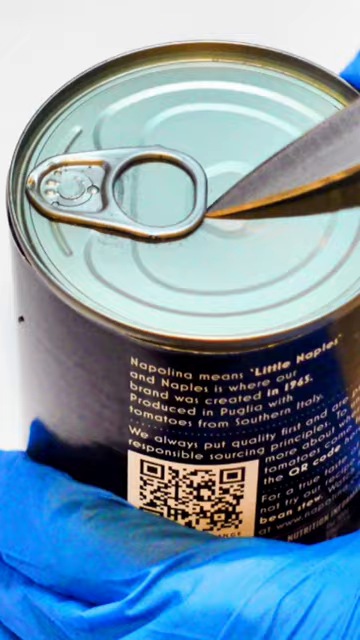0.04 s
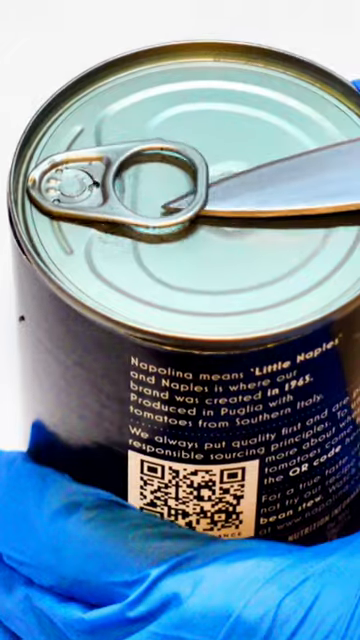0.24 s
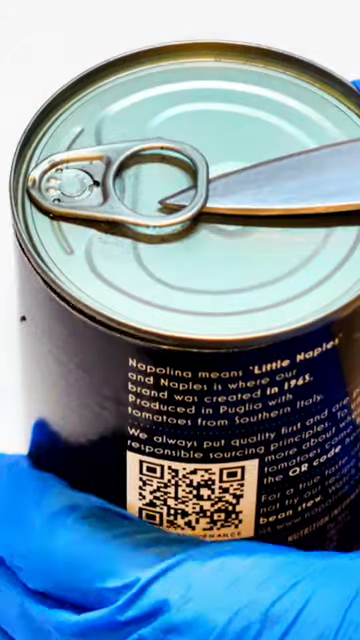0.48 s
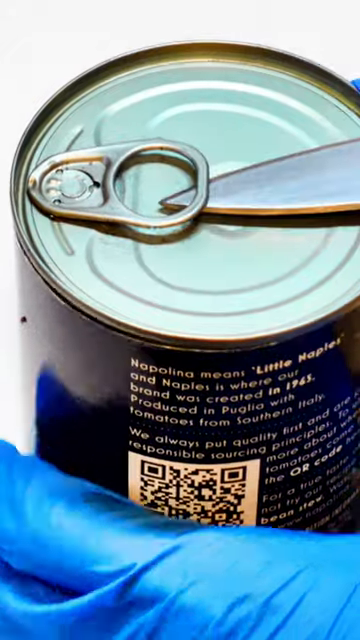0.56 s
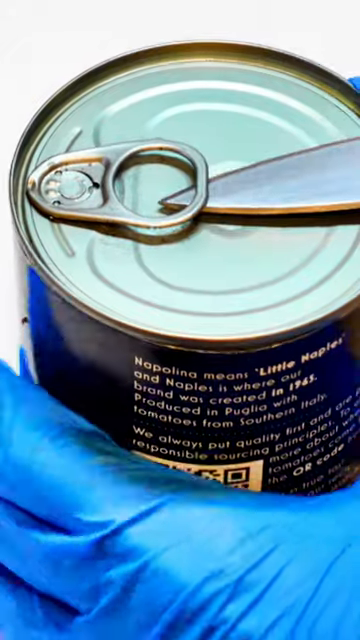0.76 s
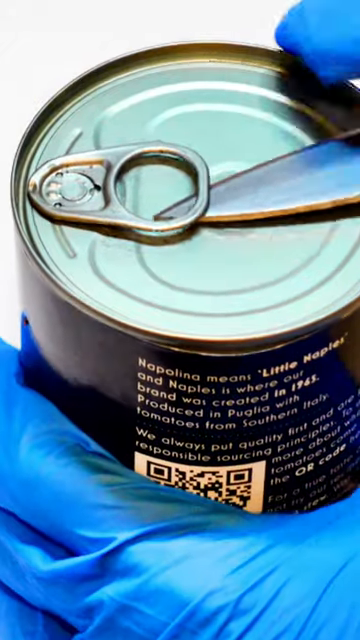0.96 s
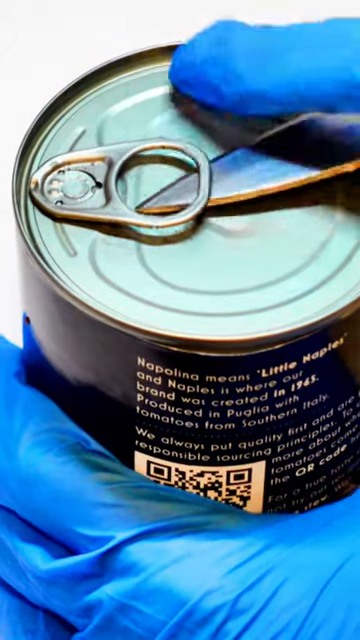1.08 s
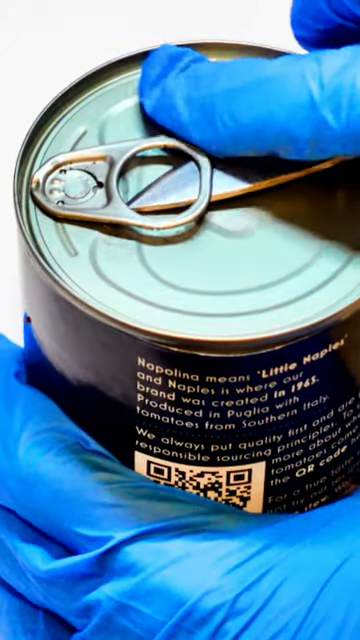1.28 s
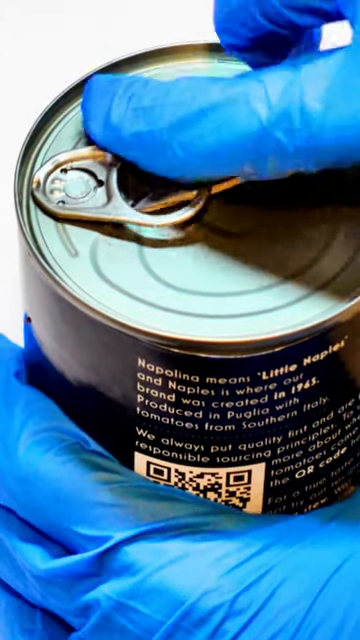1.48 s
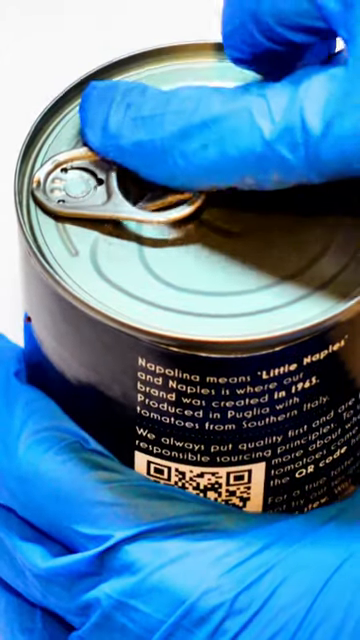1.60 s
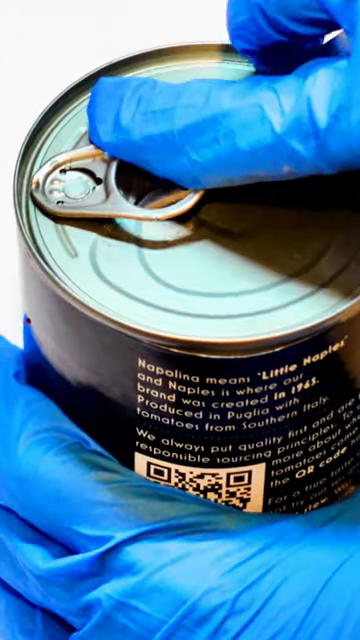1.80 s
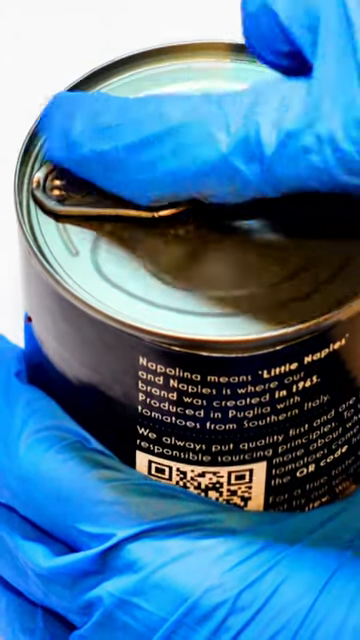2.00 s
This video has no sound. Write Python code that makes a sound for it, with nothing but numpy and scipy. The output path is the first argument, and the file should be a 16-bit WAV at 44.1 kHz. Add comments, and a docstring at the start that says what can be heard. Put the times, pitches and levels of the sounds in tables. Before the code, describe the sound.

A knife tip skids and taps on a tin can lid from about 0.1 seconds, clacking under the ring pull near 0.3 with a soft handling rumble. At 1 second the blade pries with a short metallic scrape and click. A rubber glove rustles faintly until the end, and the ring ticks sharply at 1.8 seconds. Steady hiss and a low hum fill the small room.

```python
"""A knife tip skids and taps on the lid of a full tin can, knocks under the ring pull and pries it up.
Lid and ring sound as damped modes plus a noisy crack; sliding is a stream of tiny slips.
The holding hand settles with a soft rumble; a gloved finger rustles in and lifts the ring, which ticks.
A hard surface close by echoes everything, in a small room with steady hiss and a low hum."""
import sys
import numpy as np
from scipy import signal
from scipy.fft import rfft, irfft
from scipy.io import wavfile

SR = 44100
rng = np.random.default_rng(int(sys.argv[2]) if len(sys.argv) > 2 else 0)


def generate_wav(signal):
    """Clip the signal to [-1, 1] and save it as 16-bit WAV at the path in sys.argv[1]."""
    frames = np.transpose(np.atleast_2d(signal))
    scaled = np.clip(frames, -1, 1) * 32767
    pcm = np.round(scaled).astype(np.int16)
    wavfile.write(sys.argv[1], SR, pcm)


N = 90404
TIME_S, DECAY_TIME_S = np.arange(N) / SR, np.arange(SR // 2) / SR

# Each row: frequency in Hz, t60 in seconds before blade damping, tapped level in dB, pried level in dB.
LID_MODES = [(588.7, 0.21, -13, -25.5), (828, 0.11, -50, -50), (1021, .09, -29, -48),
             (1144, 0.2, -5.5, -15), (1238, .12, -8.5, -28), (1322, 0.044, 0, -27),
             (1380, 0.15, -2.5, -1.5), (1425, 0.04, -3, -30), (1504, 0.42, -11.5, -15),
             (1592, 0.51, -18, -14), (1685, .12, -39, -24), (2625, 0.13, -29, -20.5),
             (3095, 0.24, -21, -43), (3120, 0.043, -31, -31)]
# Each row: frequency in Hz, t60 in seconds, level in dB.
RING_PULL_MODES = [(507.6, 0.1, -12.5), (556, 0.025, -6.5), (588.6, 0.066, 0), (870, 0.21, -17.5),
                   (1332, 0.036, 1.5), (1740, 0.18, -10), (1956, 0.12, -10), (2069, 0.085, 1),
                   (2000, 0.065, -2.5), (2444, 0.065, -9), (2454, 0.068, -8), (2660, 0.072, -12),
                   (4170, 0.06, -11), (6760, 0.046, -12)]

# Blade impacts. Each row: start in seconds, mode gain in dB, crack gain in dB.
LID_TAPS = [(0.1403, -53.5, -52), (0.16, -28.5, -35), (0.1643, -49, -41), (0.1807, -38, -44.5),
            (0.2107, -45, -48)]
PRY_SLIPS = [(1.0007, -42.5, -64.5), (1.0112, -36, -53.5)]
RING_KNOCKS = [(.2619, -40.5, -40), (.2752, -31, -32.5), (.281, -51, -38), (1.8982, -64, -51)]
# Small impacts. Each row: start in seconds, gain in dB.
CAN_BUMPS = [(.141, -48), (0.2774, -36.5), (.9825, -36.5)]
RIVET_TICKS = [(1.8062, -41.5), (1.81, -34)]
# Blade strokes. Each row: start in seconds, length in seconds, lid gain in dB, grit gain in dB.
TIP_SKIDS = [(0.086, 0.064, -61, -59.5), (0.15, 0.082, -45, -52.5), (.206, 0.064, -48.5, -46.5)]
PRY_GRINDS = [(.983, .075, -53, -57), (1.15, .08, -66, -60)]
# Finger strokes. Each row: start in seconds, length in seconds, gain in dB.
GLOVE_RUBS = [(0.086, 0.13, -63), (0.31, 0.74, -64.5), (0.576, 0.053, -59), (0.792, 0.068, -57.5),
              (0.847, 0.67, -61.5), (1.196, 0.16, -65.5), (1.248, 0.019, -54), (1.318, 0.38, -62.5),
              (1.812, 0.09, -58), (1.885, 0.047, -51), (1.921, 0.14, -64), (2.011, 0.098, -53.5)]
FINGER_DRAGS = [(0.104, 0.029, -60), (1.224, 0.009, -61.5), (1.251, 0.011, -55), (1.38, 0.076, -58)]

# Noise spectra. Each row: frequency in Hz, relative density in dB.
HISS_SPECTRUM = [(25, -27), (50, -16.5), (80, -5.5), (140, 1.5), (210, 2), (310, 1.5), (400, -2.5),
                 (550, -2.5), (800, -6.5), (1200, -8), (2000, -10), (4000, -16.5), (7000, -22),
                 (10000, -22)]
HAND_SPECTRUM = [(25, -33), (70, -19.5), (150, 0), (250, -8.5), (500, -21), (2000, -50)]
SKID_SPECTRUM = [(200, -4), (800, -11), (2000, 16), (3800, 4.5), (5500, 4.5), (7000, -1.5), (10500, -7)]
TAP_SPECTRUM = [(100, -26), (400, -27), (750, -20), (1300, 7.5), (2100, -9.5), (3000, 3), (3900, -6),
                (5200, -1), (7200, -11.5), (8600, -5), (10500, -20)]
PRY_SPECTRUM = [(200, -17), (800, -23), (1400, 12.5), (2500, 5.5), (3700, 1), (5500, -9), (10500, -28)]
RUB_SPECTRUM = [(200, -5), (1000, -27), (2500, 0), (4000, -6.5), (6000, 2), (8000, -1), (10500, 0.5)]
DRAG_SPECTRUM = [(200, -37), (2500, -9), (4300, -2.5), (5500, 6), (7000, -2), (8000, -7), (10500, -14)]
KNOCK_SPECTRUM = [(100, -29), (350, -65), (550, 5), (900, -0.5), (2100, 11), (3000, -6), (3800, -2),
                  (5000, -11.5), (6700, -9.5), (10500, -16)]
TICK_SPECTRUM = [(200, -21), (1700, -16), (2700, 3.5), (5200, -1.5), (6500, -8.5), (8000, -6.5),
                 (9500, 4.5), (10500, -4.5)]

# Each row: frequency in Hz, left-right correlation from 0 to 1.
HISS_CORRELATION = [(30, 0.22), (150, 0.3), (350, 0.84), (700, 0.93), (3000, 0.81), (10000, 0.9)]
# Each row: frequency in Hz, t60 in seconds.
ROOM_DECAY = [(150, .4), (500, .6), (750, .9), (1300, .65), (2000, .6), (5000, .5), (10000, .4)]
# Nearby surface. Each row: frequency in Hz, relative gain in dB.
ECHO_RESPONSE = [(100, -1), (1000, 0.5), (6500, 2), (10000, -3)]


def amp(db):
    """Decibels to gain."""
    return 10 ** (np.asarray(db) / 20)


def unit_rms(x):
    """Scales to rms 1."""
    return x / np.sqrt(np.mean(x ** 2) + 1e-20)


def lookup(table, hz):
    """Interpolates on a log-frequency axis."""
    table_hz, values = np.transpose(table)
    return np.interp(np.log(hz + 1), np.log(table_hz + 1), values)


def add(mix, start_s, sound):
    """Mixes a sound in place."""
    part = mix[max(round(start_s * SR), 0):][:len(sound)]
    part += sound[:len(part)]


def colour(x, spectrum):
    """Filters by a spectrum, to rms 1."""
    gain = amp(lookup(spectrum, np.fft.rfftfreq(len(x), 1 / SR)))
    return unit_rms(irfft(rfft(x) * gain, len(x)))


def high_pass(x, hz, order):
    """Butterworth bass cut."""
    return signal.sosfilt(signal.butter(order, hz, "high", fs=SR, output="sos"), x)


def drift(rate_hz):
    """Slow random wander, rms 1."""
    rolloff = 1 + (np.fft.rfftfreq(N, 1 / SR) / rate_hz) ** 4
    return unit_rms(irfft(rfft(rng.standard_normal(N)) / rolloff, N))


def decay(t60_s):
    """Exponential fall, 60 dB in t60_s."""
    return amp(-60 * DECAY_TIME_S / t60_s)


def ramp(time_s, rise_s):
    """Linear rise from 0 to 1."""
    return np.clip(time_s / rise_s, 0, 1)


def ringing(modes):
    """One decaying sine per mode."""
    return sum(amp(db) * decay(t60_s) * np.sin(2 * np.pi * hz * DECAY_TIME_S) for hz, t60_s, db in modes)


def crack(spectrum, t60_s, tail_db, tail_t60_s):
    """Dense, fast-dying overtones of a metal contact, as noise."""
    envelope = decay(t60_s) + amp(tail_db) * decay(tail_t60_s)
    return colour(rng.choice([-1., 1.], len(DECAY_TIME_S)), spectrum) * envelope


def stroke(start_s, length_s, skew):
    """Swell and release of one slide; skew below 1 peaks early."""
    progress = np.clip((TIME_S - start_s) / length_s, 0, 1)
    return np.abs(np.sin(np.pi * progress ** skew))


def grains(per_s, spread_db):
    """Friction: tiny random slips of uneven size."""
    slips = rng.standard_normal(N) * (rng.random(N) < per_s / SR)
    return slips * amp(spread_db * np.minimum(rng.exponential(1, N), 3))


def background(hum_hz=98.5, hum_start_s=0.21, drone_hz=204):
    """Steady stereo hiss, a wavering hum and a fluttering low drone."""
    correlation = lookup(HISS_CORRELATION, np.fft.rfftfreq(N, 1 / SR))
    mid = rfft(colour(rng.standard_normal(N), HISS_SPECTRUM)) * np.sqrt((1 + correlation) / 2)
    side = rfft(colour(rng.standard_normal(N), HISS_SPECTRUM)) * np.sqrt((1 - correlation) / 2)
    hiss = irfft(np.array([mid + side, mid - side]), N) * amp(-58.5 + 0.78 * drift(rate_hz=1.35))
    hum = np.sqrt(2) * np.sin(2 * np.pi * hum_hz * TIME_S + 0.35 * drift(rate_hz=15))
    hum *= amp(-70 + 2.6 * drift(rate_hz=2.4)) * ramp(TIME_S - hum_start_s, rise_s=0.02)
    drone = np.sin(2 * np.pi * drone_hz * TIME_S + drift(rate_hz=29))
    drone *= amp(-67.5) * drift(rate_hz=18.6)
    return hiss + hum + drone


def hand():
    """The holding hand settles on the can with a soft low rumble."""
    envelope = amp(-59.5) * stroke(start_s=0.07, length_s=0.28, skew=0.7)
    return envelope * colour(rng.standard_normal(N), HAND_SPECTRUM)


def lid():
    """The knife skids, taps and pries on the lid; blade contact damps the modes."""
    out = np.zeros(N)
    tapped = ringing((hz, t60_s, db) for hz, t60_s, db, _ in LID_MODES) * decay(t60_s=2.1)
    pried = ringing((hz, t60_s, db) for hz, t60_s, _, db in LID_MODES) * decay(t60_s=0.6)
    skidded = tapped * decay(t60_s=0.08)
    for start_s, modes_db, crack_db in LID_TAPS:
        contact = crack(TAP_SPECTRUM, t60_s=0.028, tail_db=-11, tail_t60_s=0.13)
        add(out, start_s, amp(modes_db) * tapped + amp(crack_db) * contact)
    for start_s, modes_db, crack_db in PRY_SLIPS:
        contact = crack(PRY_SPECTRUM, t60_s=0.03, tail_db=3, tail_t60_s=0.25)
        add(out, start_s, amp(modes_db) * pried + amp(crack_db) * contact)
    friction = grains(per_s=3000, spread_db=-0.5)
    for strokes, response, spectrum in (TIP_SKIDS, skidded, SKID_SPECTRUM), (PRY_GRINDS, pried, PRY_SPECTRUM):
        body = unit_rms(signal.fftconvolve(friction, response)[:N])
        grit = colour(friction, spectrum)
        for start_s, length_s, lid_db, grit_db in strokes:
            out += stroke(start_s, length_s, skew=0.7) * (amp(lid_db) * body + amp(grit_db) * grit)
    return high_pass(out, hz=460, order=2)


def glove():
    """Thin rubber rustles over the metal and at times drags with a narrow rasp."""
    rubs = sum(amp(db) * stroke(start_s, length_s, skew=0.54) for start_s, length_s, db in GLOVE_RUBS)
    drags = sum(amp(db) * np.sqrt(stroke(start_s, length_s, skew=0.93))
                for start_s, length_s, db in FINGER_DRAGS)
    rasp = drags * colour(grains(per_s=2900, spread_db=2.5), DRAG_SPECTRUM)
    rustle = rubs * colour(grains(per_s=6000, spread_db=-3), RUB_SPECTRUM)
    return rustle + rasp


def ring_pull():
    """The ring clacks against the blade, bumps the can and ticks at its rivet as it bends."""
    out = np.zeros(N)
    clack = ringing(RING_PULL_MODES) * ramp(DECAY_TIME_S, rise_s=0.00041)
    for start_s, modes_db, crack_db in RING_KNOCKS:
        contact = crack(KNOCK_SPECTRUM, t60_s=0.04, tail_db=-10, tail_t60_s=0.13)
        add(out, start_s, amp(modes_db) * clack + amp(crack_db) * contact)
    for start_s, db in RIVET_TICKS:
        tick = crack(TICK_SPECTRUM, t60_s=0.0095, tail_db=-15.5, tail_t60_s=0.09)
        add(out, start_s, amp(db) * high_pass(tick, hz=1880, order=3))
    bump = ringing([(537, 0.012, -3)]) * ramp(DECAY_TIME_S, rise_s=0.0012)
    for start_s, db in CAN_BUMPS:
        add(out, start_s, amp(db) * bump)
    return out


def room_reverb(x):
    """Diffuse stereo tail, longest in the midrange."""
    hz, frame_s, noise = signal.stft(rng.standard_normal((2, SR)), SR, nperseg=256)
    t60_s = lookup(ROOM_DECAY, hz)[:, None]
    _, tails = signal.istft(noise * amp(-60 * frame_s / t60_s), SR, nperseg=256)
    mid, side = tails * ramp(np.arange(tails.shape[1]) / SR, rise_s=0.0084)
    response = mid + amp(-8.5) * np.array([side, -side])
    return signal.fftconvolve(x[None], response / np.linalg.norm(response[0]), axes=1)[:, :N]


def with_echo(x, delay_s=0.003773):
    """Adds one strong early reflection off a hard surface."""
    hz = np.fft.rfftfreq(2 * N, 1 / SR)
    reflection = 0.55 * amp(lookup(ECHO_RESPONSE, hz)) * np.exp(-2j * np.pi * hz * delay_s)
    return irfft(rfft(x, 2 * N) * (1 + reflection))[:, :N]


def scene():
    """The can in its room, in stereo."""
    can = high_pass(lid() + ring_pull() + glove(), hz=390, order=4)  # a steep bass cut below 390 Hz
    return with_echo(can + amp(-14) * room_reverb(can) + hand() + background())


def record(dry):
    """Opens after a brief silence; low-passes the top treble."""
    silence_s, cutoff_hz = 0.084, 10450
    opened = dry * ramp(TIME_S - silence_s, rise_s=0.0016)
    low_pass = signal.firwin(511, cutoff_hz, window=("kaiser", 8), fs=SR)
    return signal.oaconvolve(opened, low_pass[None], "same")


dry = scene()
out = record(dry)
generate_wav(out)
```